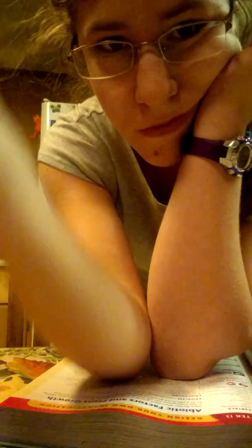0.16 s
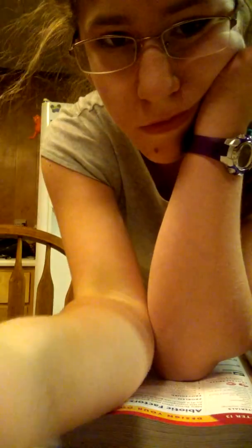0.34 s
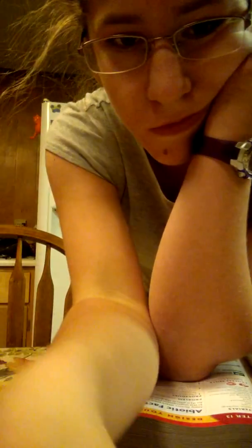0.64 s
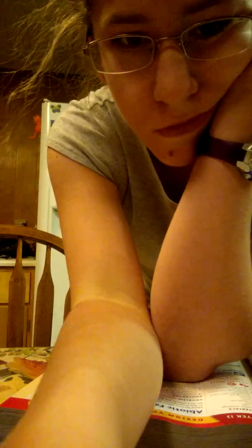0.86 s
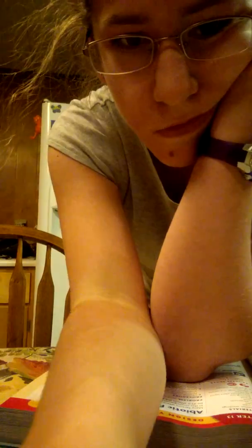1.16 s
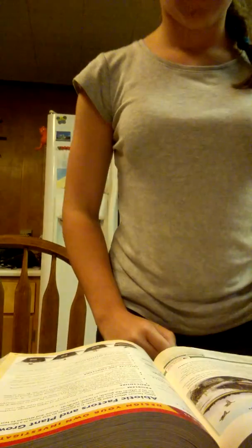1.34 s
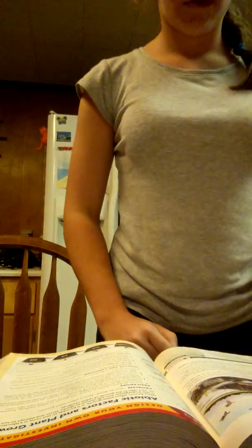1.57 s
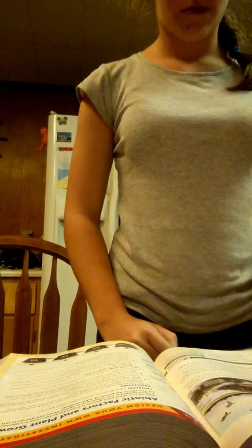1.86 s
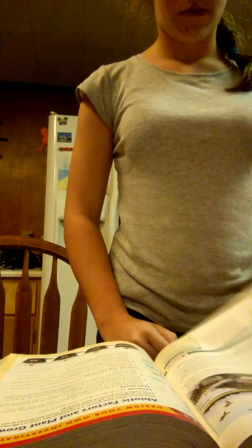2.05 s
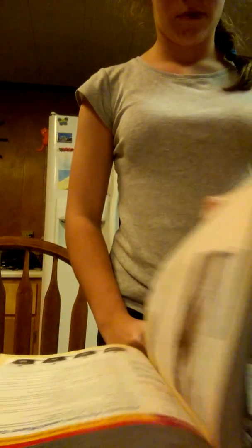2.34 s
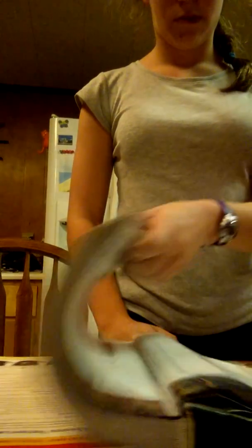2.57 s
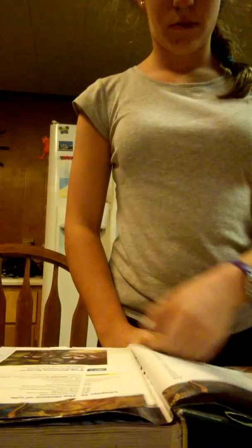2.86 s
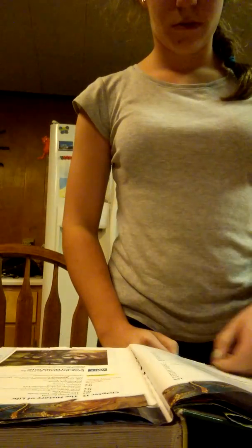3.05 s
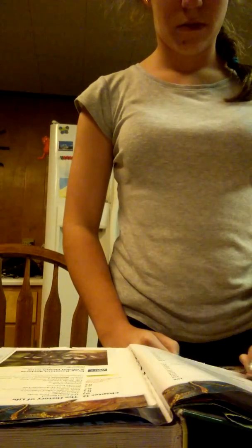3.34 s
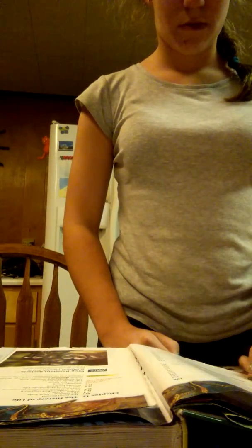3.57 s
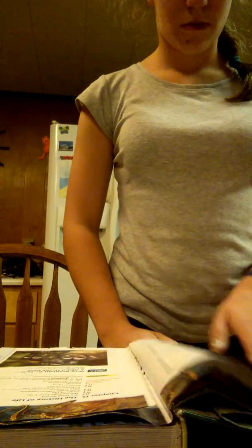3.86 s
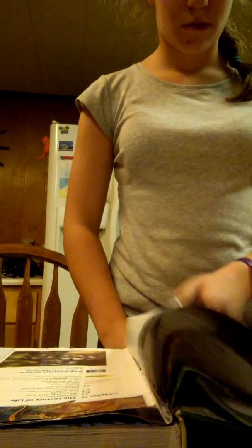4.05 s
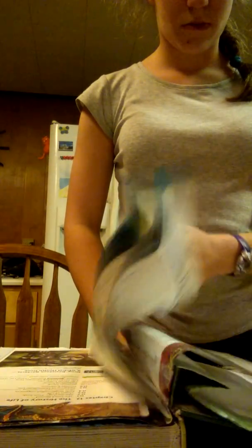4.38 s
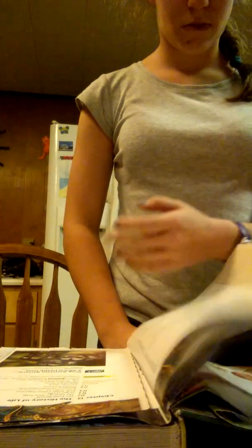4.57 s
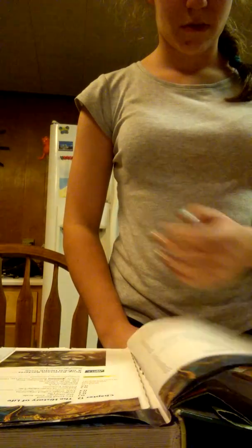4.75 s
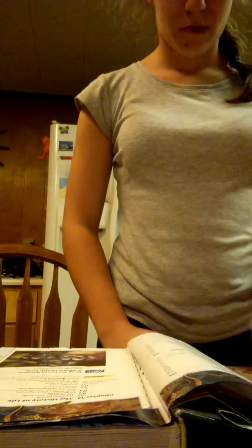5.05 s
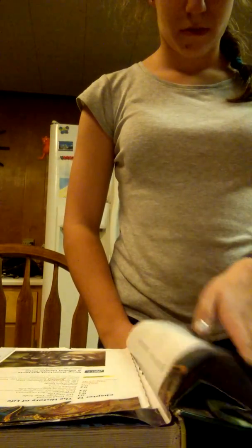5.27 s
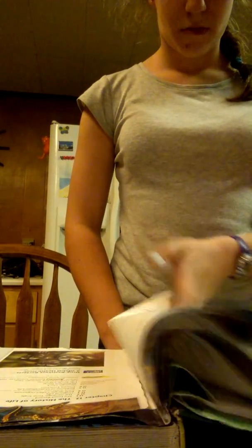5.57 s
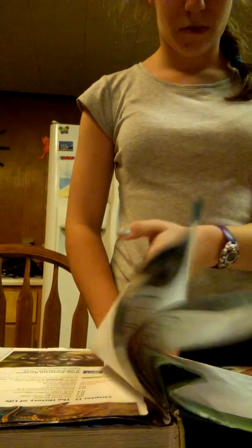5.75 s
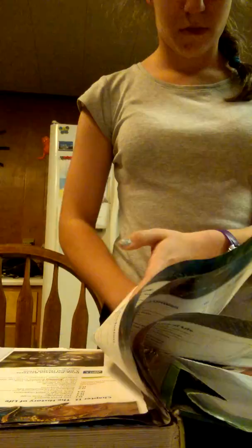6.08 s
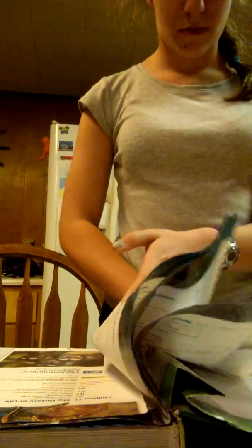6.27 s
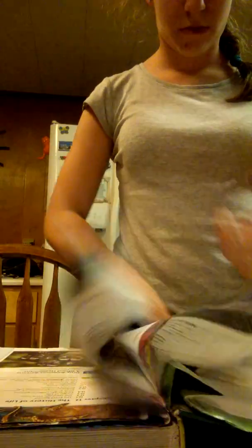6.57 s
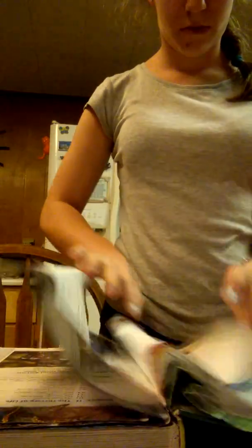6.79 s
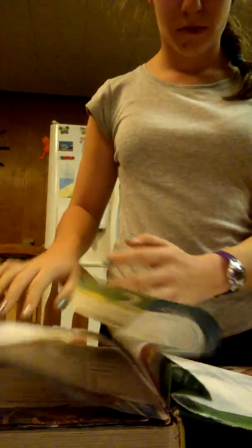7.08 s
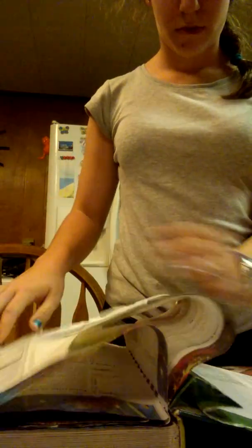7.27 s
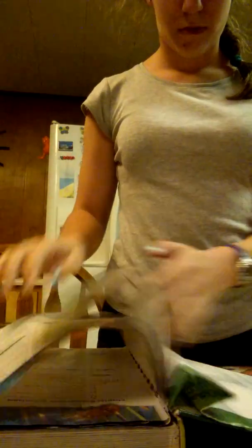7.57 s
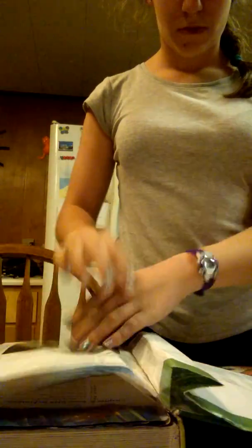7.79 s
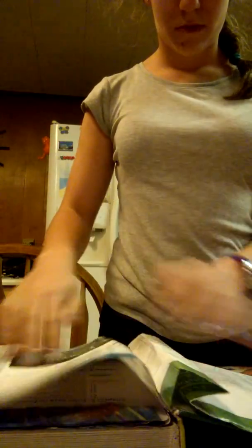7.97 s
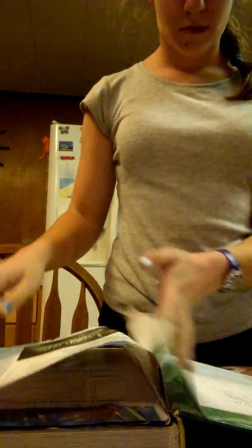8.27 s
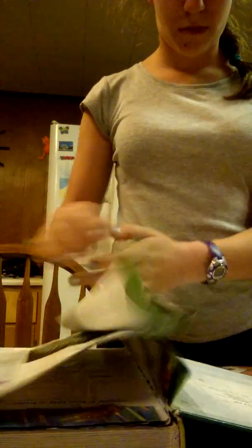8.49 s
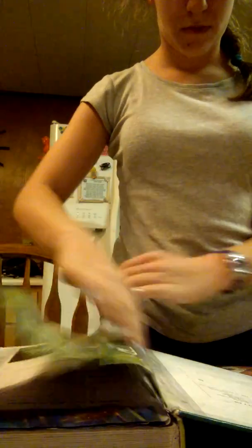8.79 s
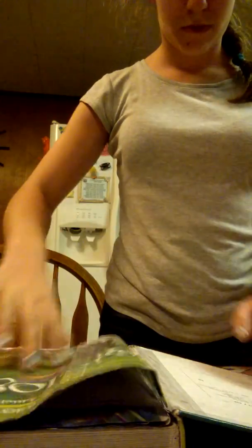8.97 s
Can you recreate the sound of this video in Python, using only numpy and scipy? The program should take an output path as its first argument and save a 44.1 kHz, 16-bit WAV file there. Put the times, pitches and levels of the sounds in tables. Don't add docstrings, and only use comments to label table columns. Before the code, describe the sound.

The start is nearly silent: low kitchen rumble, faint fridge hum and slight hiss. From about 1.35 s there are small paper ticks, a soft tap and a light nudge at 1.8 s. At 2.05 s the heavy cover slams down, by far the loudest event: a sharp crack, deep wooden table thump and low puff of air, dying quickly. Quiet until 3.1 s, then glossy sheets crackle and snap densely from 3.3 to 3.9 s. A lull with small ticks and pats follows, then another burst at 4.85-5.15 s. From 5.4 s riffling is nearly continuous, with bright snaps near 5.85, 6.15 and 6.5 s, a table knock at 6.8 s, more snaps at 7.0-7.25 s, and a firm thump with a puff at 7.45 s. Looser rustles and slaps continue to 8.4 s, then a soft pat at 8.7 s and a faint tap around 9.1 s. Close, dry stereo with short room reverberation.

```python
import sys
import numpy as np
from scipy import signal
from scipy.fft import rfft, irfft, next_fast_len
from scipy.io import wavfile
from scipy.ndimage import uniform_filter1d

SR = 44100
rng = np.random.default_rng(int(sys.argv[2]) if len(sys.argv) > 2 else 0)


def to_wav(sig):
    pcm = np.clip(np.atleast_2d(sig), -1, 1) * 32767
    pcm = np.round(pcm).astype(np.int16)
    wavfile.write(sys.argv[1], SR, pcm.T)


def rack_gain(trim_db):
    fader = np.asarray(trim_db, float)
    return 10 ** (fader / 20)


N = 402543
M = next_fast_len(N + SR)
F = np.maximum(np.fft.rfftfreq(M, 1 / SR), 1)
STEP = 16


def shape(points):
    hz, db = np.transpose(points)
    return rack_gain(np.interp(np.log(F), np.log(hz), db))


def colour(x, gain):
    return irfft(rfft(x, M) * gain, M)[..., :N]


def unit(x):
    return x / np.sqrt(np.mean(x ** 2))


def walk(rate_hz):
    hold = int(SR / rate_hz)
    steps = np.repeat(rng.standard_normal(N // hold + 1), hold)
    return 2.37 * uniform_filter1d(uniform_filter1d(steps, hold), hold)[:N]


def add(out, at_s, x):
    i = int(at_s * SR)
    out[i:i + len(x)] += x[:N - i]


def ring(hz, db, t60_s, rise_s):
    t = np.arange(int(0.83 * t60_s * SR)) / SR
    return rack_gain(db - 60 * t / t60_s) * (1 - np.exp(-t / rise_s)) * np.sin(2 * np.pi * hz * t)


def swell(at_s, db, rise_s, fall_s, follow=1):
    t = np.arange(0, N, STEP) / SR - at_s
    drop = np.maximum(-t / max(rise_s, .005), t / max(fall_s, .005))
    return rack_gain(db - 20 * follow * drop)


def crackle(rate_hz, spread_db, smear_s):
    sizes = rack_gain(np.minimum(spread_db * rng.exponential(size=N), 15))
    hits = (rng.random(N) < rate_hz / SR) * sizes
    return unit(signal.lfilter([1], [1, -np.exp(-1 / (smear_s * SR))], hits))


def diffuse(make, gain, alike_hz):
    alike = np.sqrt(1 / (1 + (F / alike_hz) ** 2))
    both, one, other = rfft(make * rng.standard_normal((3, N)), M)
    pair = alike * both + np.sqrt(1 - alike ** 2) * np.array([one, other])
    return unit(irfft(gain * pair, M)[:, :N])


def capsules(x, lag, shade, shade_hz, far_db):
    near, other = rfft(x * np.ones((2, 1)), M)
    low = 1 / (1 + 1j * F / shade_hz)
    delay = np.exp(-2j * np.pi * F * lag / SR)
    far = rack_gain(far_db) * delay * (low * near + shade * (1 - low) * other)
    return irfft(np.array([far, near]), M)[:, :N]


def capsule_hiss():
    # frequency in Hz, level in dB.
    hiss = [(25, 0), (150, -7.5), (600, -7), (2000, -3), (4000, -6.5), (8000, -5), (15000, -5.5)]
    return rack_gain(-58.5) * unit(colour(rng.standard_normal((2, N)), shape(hiss)))


def kitchen():
    # frequency in Hz, level in dB.
    rumble = [(25, 9.5), (70, -7), (150, -9), (300, 1), (500, -4), (1000, -10), (2000, -25.5), (4000, -30),
              (9000, -61)]
    level_db = -62 + .6 * walk(5.3)
    return rack_gain(level_db) * diffuse(1, shape(rumble), alike_hz=1318)


def fridge():
    level_db = -68 + .6 * walk(5.2)
    hum = rack_gain(level_db) * np.sin(2 * np.pi * 121 * np.arange(N) / SR)
    return capsules(hum, lag=2.3, shade=1.0, shade_hz=3000, far_db=-1.0)


def room(x):
    t60_s, level_db, build_s = 0.29, -13.5, 0.016
    t = np.arange(N) / SR
    fade = rack_gain(-60 * t / t60_s) * (1 - np.exp(-t / build_s))
    echo = diffuse(fade, 1 / np.sqrt(1 + (F / 9000) ** 2), alike_hz=1290) / np.sqrt(N)
    return rack_gain(level_db) * colour(echo, rfft(x, M))


def puffs():
    # peak in seconds, level in dB, seconds to fade 20 dB.
    gusts = [(2.06, -39, 0.33), (3.61, -62, 0.5), (4.35, -66, 18), (4.98, -49, 0.5), (5.7, -61, 1),
             (5.901, -52.5, -0.8), (6.37, -53, 0.7), (7.27, -52, .15), (5.2, -56, -0.7), (6.79, -50, 0.1),
             (7.45, -42, 0.15), (8.36, -54, 0.8), (8.72, -55, 0)]
    band = 1 / (1 + (F / 90) ** 3) / (1 + (20 / F) ** 4)
    rumble = diffuse(1, band, alike_hz=400)
    level = rack_gain(-100)
    for at_s, db, fall_s in gusts:
        level = level + swell(at_s, db - 12.0, 0.79 * fall_s, fall_s)
    return rumble * np.repeat(level, STEP)[:N]


def knocks():
    starts = (1.81, 2.032, 2.0345)
    # frequency in Hz, level in dB, t60 in seconds.
    jolts = [
        [(214, -29.5, 0.133), (268, -30.5, 0.28), (363, -28.5, 0.56), (460, -39.5, 0.54), (755, -35, 0.03)],
        [(344, -5.5, 0.026)],
        [(217.59, -20, 0.029), (920, -3.5, 0.0062), (1860, -12, 0.01), (4080, -11.5, 0.0072),
         (5500, -10.5, 0.0084), (12800, -16.5, 0.0045)],
    ]
    out = np.zeros(N)
    for at_s, modes in zip(starts, jolts):
        for hz, db, t60_s in modes:
            add(out, at_s, ring(hz, db, t60_s, rise_s=0.37 / hz))
    return out


def table():
    # start in seconds, peak in dB, centre in Hz, weight of the deep modes in dB.
    thumps = [(1.424, -38, 554, -29), (2.05, -27, 590, -14), (2.055, -4.5, 221, -4), (2.067, -9, 272, -25),
              (2.074, -14, 570.5, -20), (3.135, -30, 564, -9), (4.379, -33, 255, -2),
              (4.419, -42.5, 576, -15), (4.866, -23, 604, -24), (4.879, -31, 560, -22),
              (6.781, -20.5, 260, -3), (6.792, -13.5, 537, -21), (6.802, -31, 400, -14),
              (6.81, -28, 480, -14), (6.82, -33, 422, -14), (6.85, -31, 450, -6), (7.455, -24, 453, -9),
              (7.49, -34, 480, -17), (7.431, -24.5, 196, 4), (7.443, -9, 550, -21), (7.47, -28, 560, -23),
              (8.691, -34, 600, -6), (9.08, -29, 517, -29)]
    # frequency in Hz, level in dB, t60 in seconds.
    modes = [(45.3, -13, 0.24), (95.6, -10, 0.17), (141, -3, 0.082), (241, 0, 0.059), (265, -43, 0.033),
             (358, -6, 0.069), (474, 2.5, 0.034), (565, -2, 0.066), (606, -4, 0.038), (737, -12, 0.021)]
    out = np.zeros(N)
    chance = rng.standard_normal((len(thumps), len(modes), 2))
    for (at_s, db, centre_hz, deep_db), row in zip(thumps, chance):
        for (hz, mode_db, t60_s), (a, b) in zip(modes, row):
            off_db = deep_db if hz < 200 else -9.0 * np.log2(hz / centre_hz) ** 2
            peak_db = db - 9.5 + mode_db + off_db + 2.56 * a
            tone = ring(hz * (1 + 0.013 * b), peak_db, t60_s, rise_s=0.0035)
            add(out, at_s + 0.0015 * abs(b), np.sign(a) * tone)
    return out


def clicks():
    # start in seconds, peak in dB, treble in dB.
    loud = [(1.3553, -33, -39), (1.3714, -38, -27), (1.51, -38, -2), (1.5858, -42, -6),
            (1.6062, -20.5, -11.5), (1.7, -47, -15), (1.7125, -49, -21), (1.8895, -29, -15),
            (3.1393, -41, -13), (3.1887, -33, -28), (3.3233, -27, -29), (3.3773, -13.5, -14),
            (3.3985, -22, -7), (3.445, -23, -14), (3.4627, -28, -8), (3.5018, -14, -11.5),
            (3.5438, -14, -6.5), (3.5519, -14.5, -5.5), (3.5829, -13, -19), (3.598, -17, -17),
            (3.6152, -20.5, -21), (3.7434, -30, -15), (3.8483, -22.5, -6), (3.937, -29, -10),
            (4.2053, -41.5, -21), (4.5765, -32.5, -19), (4.8279, -30.5, -14), (4.853, -23, -15),
            (4.9008, -16, -14), (5.0406, -11, -16), (5.0576, -23, -19), (5.0806, -23, -22),
            (5.1198, -19, -20), (5.5504, -19.5, -22), (5.6383, -31, -20), (5.6693, -26, -24),
            (5.7239, -21, -15), (5.8281, -16, -8), (5.8407, -9, -8), (5.9623, -11, -22), (6.0524, -26, -27),
            (6.0995, -14.5, -15), (6.114, -20, -17), (6.1671, -17, -16), (6.2852, -19, -18),
            (6.381, -26, -9), (6.4308, -26, -11), (6.5267, -12, -16), (6.638, -23, -10.5),
            (7.0315, -14.5, -20), (7.101, -24.5, -16), (7.1859, -12, -15.5), (7.2563, -20, -22),
            (7.5416, -20.5, -9), (7.6779, -20, -13), (7.7579, -24.5, -16), (8.2831, -19, -18),
            (8.3713, -22, -9), (8.3762, -25, -1.5), (8.7514, -34, -28)]
    # start in seconds, peak in dB, treble in dB.
    faint = [(1.3994, -49, -16), (1.4616, -42, -27), (1.7764, -36, -16), (3.2695, -41, -11),
             (4.1809, -44, -10), (4.4204, -39, -12), (4.9384, -22, -14), (4.9804, -22, -18),
             (4.9964, -27, -16), (5.4071, -38, -18), (5.7414, -28, -7), (5.7857, -31, -12),
             (5.9774, -30, -6), (6.1994, -23, -11), (6.7605, -35.5, -19), (6.9544, -19, -13),
             (7.1337, -31, -19), (7.3776, -35, -27), (7.431, -39, -11), (7.442, -32, -14),
             (7.6006, -32, -9), (7.8471, -26, -18), (7.9189, -32, -18), (7.9693, -24, -11),
             (7.9862, -27.5, -20), (8.0744, -29, -17), (8.2072, -34, -13), (8.2482, -28, -11),
             (8.3624, -18, -12)]
    # frequency in Hz, level in dB, t60 in seconds.
    sheet = [(692, -17, 0.0076), (1285, -12, 0.0089), (1920, -1.5, 0.019), (3200, -2, 0.0025),
             (4400, 6.5, 0.0085), (6250, 7.5, .008), (8700, -4, 0.0029), (11550, -6, 0.0036),
             (13400, -8, .003)]
    out = np.zeros((2, N))
    chance = rng.standard_normal((len(loud + faint), len(sheet), 3))
    for (at_s, db, treble_db), row in zip(loud + faint, chance):
        for (hz, mode_db, t60_s), (a, *apart) in zip(sheet, row):
            high = hz > 2700
            peak_db = db - 2.5 + mode_db + high * treble_db + 2.5 * a
            for part, b in zip(out, apart):
                detune = .06 * (b if high else apart[0])
                add(part, at_s, ring(hz * (1 + detune), peak_db, t60_s, rise_s=.13 / hz))
    return out


def motion():
    # peak in seconds, level in dB, seconds to swell 20 dB, seconds to fade 20 dB.
    slam = [
        (2.055, -17.5, -0.0112, -0.05),
        (2.062, -27.5, 0.0164, -0.03),
        (2.067, -21, -0.16, 0.0516),
    ]
    # fastest at seconds, rustle in dB, seconds to swell 20 dB, seconds to fade 20 dB,
    # crispness in dB.
    sweeps = [(.05, -76, 20, -1.3, 9), (1.6, -70.5, 0.84, .5, -5), (1.83, -52, 0.52, 0.36, -6.5),
              (2.28, -68.5, 0.5, 0.6, 7), (3.02, -68, 0.05, 0.1, 11), (3.2, -66, 0.34, .5, 4),
              (3.55, -31, 0.1924, 0.2059, -8), (3.8, -45, 0.35, 0.11, 1), (4.1, -65.5, 1, 3, -6.5),
              (4.65, -61.5, 0.1, 0.5, 7.5), (4.8, -59.5, 0.15, 0.8, -7.5), (4.99, -40, 0.19, 0.2145, -6.5),
              (5.162, -50, -0.02, 0.1, -5), (5.599, -46.5, -0.17, 0.32, -10),
              (5.88, -44.5, 0.12, 0.27, 0.5), (6.25, -44, 0.6, 0.53, -11), (6.5, -41, .5, 0.11, -28),
              (6.968, -38.5, -0.34, 0.3, -19), (7.21, -51.5, 0.06, -0.12, -9), (7.27, -39, 0.08, 0.05, -13),
              (7.58, -50, 0.12, 0.25, 3.5), (7.7, -42.5, 0.17, 0.4, -4.5), (8.0, -52, 0.35, 1, -8),
              (8.39, -53, 0.08, 0.08, -3.5), (8.999, -69.5, -0.2, 0, 22), (9.128, -57.5, 0, .1, -13)]
    air, rustle, crisp = (swell(*row) for row in slam)
    dull = crisp * (1 - rack_gain(-12))
    for at_s, db, rise_s, fall_s, crisp_db in sweeps:
        air_db = -52.5 + 0.5 * (db + 41.5)
        air = air + swell(at_s, air_db, rise_s, fall_s)
        rustle = rustle + swell(at_s, db, rise_s, fall_s)
        crisp = crisp + swell(at_s, db + crisp_db, rise_s, fall_s, follow=0.92)
    return np.repeat([air, rustle, crisp, crisp - dull], STEP, axis=1)[:, :N]


def rustle_drive():
    grains = crackle(rate_hz=500., spread_db=11.0, smear_s=0.001)
    drive = []
    for level, share, trim_db in zip(motion(), (0.4, 0.74, 0.39, 0.63), (1.3, 1.1, 4.4, 5.3)):
        stir = level * rack_gain(trim_db + 2.46 * walk(25))
        flecks = crackle(rate_hz=120.0, spread_db=-3.5, smear_s=0.0034)
        drive.append(stir * (share * (0.41 * grains + 0.34 * flecks) + 1 - share))
    return drive


def snaps():
    # start in seconds, peak in dB, treble in dB, ring in seconds.
    pops = [(1.6075, -33, 2, 0.14), (3.377, -21.5, -4, 0.084), (3.379, -20.5, -1, 0.02),
            (3.3987, -23, -2, 0.059), (3.444, -21, -32, 0.056), (3.5516, -16, 9, 0.025),
            (4.1803, -44.5, 4, 0.068), (4.901, -19, -3.5, 0.082), (5.042, -13.5, -7, 0.037),
            (5.081, -18, -18, 0.035), (5.12, -23, -16, 0.085), (5.4057, -35, -12, 0.056),
            (5.5507, -17.5, -19, 0.051), (5.639, -33, -28, 0.028), (5.6704, -24.5, -18, 0.14),
            (5.7242, -22, -11, 0.047), (5.963, -10, -2, 0.024), (6.099, -21, -1, 0.038),
            (6.114, -16.5, -10, 0.18), (6.32, -19.5, -10, 0.096), (6.527, -16, 3, 0.039),
            (6.577, -17, -28, 0.14), (6.6374, -21.5, -10.5, 0.062), (7.1878, -12, -3, 0.015),
            (7.5397, -20, -10.5, 0.18), (7.759, -22.5, -17, 0.21), (8.2836, -16, -17.5, 0.096),
            (8.372, -24, -1, .02), (8.373, -20.5, 1, 0.082), (8.751, -34, -42, 0.032)]
    # start in seconds, peak in dB,
    # treble in dB, ring in seconds.
    flutters = [(1.885, -28, -3.5, 0.16), (3.1866, -30, -39, 0.019), (3.3227, -32, -3, 0.11),
                (3.5015, -11, -5.5, 0.03), (3.5205, -11.5, -35, 0.074), (3.582, -9.5, -4, 0.074),
                (3.5996, -15, -18, 0.037), (3.745, -35.5, -1, 0.18), (3.85, -15.5, -6, 0.083),
                (3.935, -18, -6, 0.12), (4.578, -25.5, -30, 0.037), (4.954, -14.5, -17, 0.1),
                (5.7858, -27, -37, 0.16), (5.824, -19.5, 1, 0.038), (5.8405, -7, 0.5, 0.046),
                (6.1635, -8.5, -0.5, 0.065), (6.285, -14.5, -6, 0.05), (6.344, -15, -9, 0.052),
                (6.381, -28, 1, 0.09), (6.43, -21, -2, 0.067), (6.4945, -33.5, 2.5, 0.14),
                (6.907, -16.5, -3.5, 0.22), (6.917, -20.5, -10, 0.13), (7.0307, -8, -13, 0.093),
                (7.099, -28, -39, 0.058), (7.2576, -17.5, -44, 0.19), (7.677, -17.5, -2.5, 0.14),
                (7.844, -23.5, -65, 0.094), (7.9667, -19, -7, 0.1), (8.067, -25.5, -12, 0.093),
                (1.51, -35, -1, 0.019), (1.713, -51, -18, 0.018), (3.544, -19, -2, 0.011),
               (3.367, -17, -13, 0.034), (4.892, -21, 0, 0.033), (4.996, -37, -16, 0.021),
               (5.742, -29, 0, 0.047), (6.4, -26.5, 2, 0.047), (6.611, -23, -12, 0.035),
               (7.001, -31, 0, 0.019), (7.376, -26, -38, 0.019), (5.059, -14, -2.5, .05),
               (6.199, -18, -1.5, 0.099), (6.555, -16.5, -9, 0.11), (6.94, -12.5, -10, 0.11),
               (7.052, -18.5, -11, 0.049), (7.563, -19, -19, 0.046), (7.601, -31, -6, 0.063),
               (7.984, -39, -5, .04), (8.258, -32.5, 2, 0.036), (8.361, -24, -7, 0.04)]
    # start in seconds, peak in dB, bass in dB, ring in seconds.
    slaps = [(1.3555, -33, -3, 0.11), (1.3794, -78, -14, .043), (1.4275, -46.5, 15, 0.04),
             (1.454, -41, -3, 0.16), (1.699, -41, 13.5, 0.048), (1.776, -38.5, 8, 0.07),
             (1.815, -33, 14.5, 0.016), (2.051, -10, 10, 0.043), (2.054, -9, -5.5, 0.035),
             (2.069, -6, -16, 0.084), (2.076, -9.5, 0, 0.015), (2.1774, -26.5, 4, 0.027),
             (3.139, -44.5, 13.5, 0.058), (3.543, -28, -5, 0.052), (4.204, -38, -17, 0.027),
             (4.42, -36.5, 0, 0.055), (4.685, -33.5, -4, 0.055), (4.8517, -23.5, -18, 0.19),
             (4.871, -31, -2, 0.065), (5, -42, 8, 0.08), (6.0705, -26, -18, 0.087), (6.308, -20, -16, 0.12),
             (6.76, -36, -2, 0.18), (7.431, -33.5, 7, 0.078), (7.442, -47, -1, 0.025),
             (7.9193, -29.5, -33, 0.18), (8.1945, -39, -6, 0.084), (8.207, -28.5, -8, 0.17),
             (8.248, -26, -5, 0.19), (8.738, -48, 8, 0.065)]
    return ([(s, db, treble, -29, t60, 1, 0.00058) for s, db, treble, t60 in pops]
            + [(s, db, treble, -15.5, t60, -8, 0.0037) for s, db, treble, t60 in flutters]
            + [(s, db, -19, bass, t60, -3, 0.0012) for s, db, bass, t60 in slaps])


def snap_envelope(db, t60_s, tick_db, rise_s, grit):
    lead_s, roughness = .012, 0.55
    u = np.arange(6000) / SR
    rough = 1 - roughness + roughness * grit
    fade = rack_gain(-60 * u / np.clip(t60_s, .012, .15))
    flutter = (1 - np.exp(-u / max(rise_s, .0003))) * rough * fade
    tick = (1 - np.exp(-u / .0002)) * np.exp(-u / .0014)
    lead = rack_gain(-14.5) * np.exp((u[u < lead_s] - lead_s) / 0.0022) * min(rise_s / 0.0037, 1)
    body = np.maximum(flutter, lead[-1] * np.exp(-u / rise_s))
    return rack_gain(db - 9.5) * np.r_[lead, body + rack_gain(tick_db) * tick]


def add_snaps(drive):
    grit = crackle(rate_hz=400., spread_db=5.0, smear_s=0.00078)
    for at_s, db, treble_db, bass_db, t60_s, tick_db, rise_s in snaps():
        tilt_db = 2 * rng.standard_normal()
        crack = snap_envelope(db, t60_s, tick_db, rise_s, grit[int(at_s * SR):][:6000])
        bands_db = (bass_db - 1.5, -1.5, treble_db + 8.3 - tilt_db, treble_db + 3.2 + tilt_db)
        for band, rel_db in zip(drive, bands_db):
            add(band, at_s - .012, rack_gain(rel_db) * crack)


def paper_bands():
    # frequency in Hz, level in dB.
    paper = [(60, -32.5), (250, -17.5), (500, -11), (1000, -10.5), (1400, -10.5), (2000, -3), (2800, -2),
             (4000, -9), (6200, -4.5), (8000, -11), (11000, -19.5), (15000, -23.5)]
    low, high = 1 / (1 + (F / 800) ** 4), 1 / (1 + (2700 / F) ** 4)
    gains = [shape(paper) * g for g in (low, (1 - low) * (1 - high), high)]
    bass, middle, treble = (g / np.sqrt(np.mean(g ** 2)) for g in gains)
    top = 1 / (1 + (6300 / F) ** 6)
    return bass, middle, treble * (1 - top), treble * top


def pages():
    # time in seconds, shift from lower to upper treble in dB.
    bend = [(1.5, 1.5), (2.1, -1.5), (3.0, 3), (3.4, 1.5), (3.6, -1), (3.9, -1.5), (4.9, 1), (5.1, 2),
            (5.6, 0), (5.9, 2), (6.2, -3), (6.5, 1.5), (7.0, -1), (7.2, 2.5), (7.7, -2.5), (8.0, -0.5),
            (8.26, 1.5), (8.38, -5.5)]
    drive = rustle_drive()
    add_snaps(drive)
    shift = rack_gain(np.interp(np.arange(N) / SR, *np.transpose(bend)))
    drive[2:] = drive[2] / shift, drive[3] * shift
    noise = rng.standard_normal((2, N))
    spectrum = sum(rfft(x * noise, M) * g for x, g in zip(drive, paper_bands()))
    return irfft(spectrum, M)[:, :N]


def scene():
    background = kitchen() + fridge() + capsule_hiss()
    wood = table()
    paper = pages() + clicks()
    near = capsules(paper, lag=0.7, shade=1.0, shade_hz=2000, far_db=-4.5)
    near += capsules(wood, lag=8.0, shade=0.69, shade_hz=2500, far_db=3.0)
    near += capsules(knocks(), lag=4.0, shade=0.21, shade_hz=900, far_db=-22.0)
    return near + room(paper[0] + wood) + puffs() + background


def band_limit(x):
    return signal.sosfilt(signal.butter(12, 16300, fs=SR, output="sos"), x)


def record(dry):
    lag = 16.54
    delay = np.exp(-2j * np.pi * F * lag / SR)
    late = colour(dry[::-1], delay / (1 + (F / 5600) ** 2.5))
    lift = (1 + 1j * F / 900) / (70 / 900 + 1j * F / 900)
    top = rack_gain(-34 * np.clip((F - 15250) / 350, 0, 1))
    return band_limit(colour(0.69 * (dry - late), lift * top))


dry = scene()
out = record(dry)
to_wav(out)
```